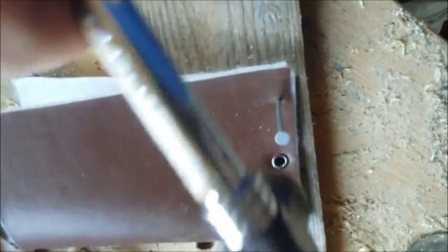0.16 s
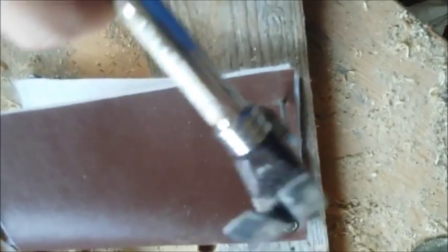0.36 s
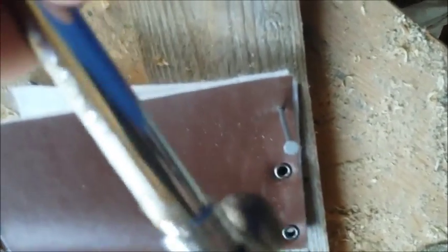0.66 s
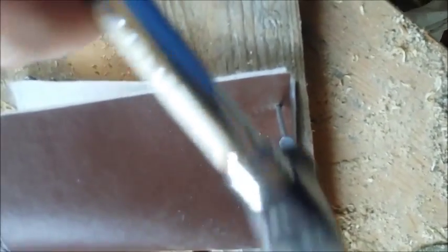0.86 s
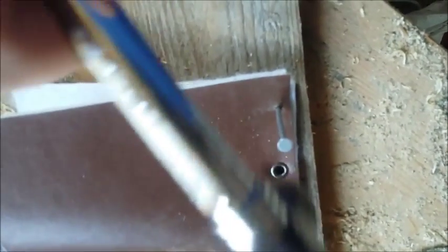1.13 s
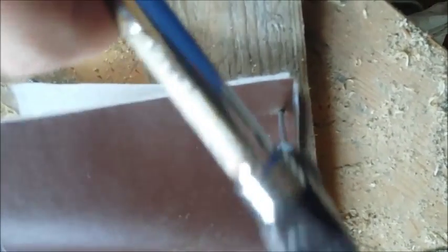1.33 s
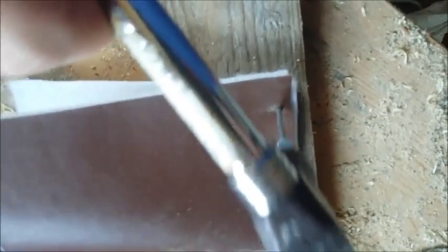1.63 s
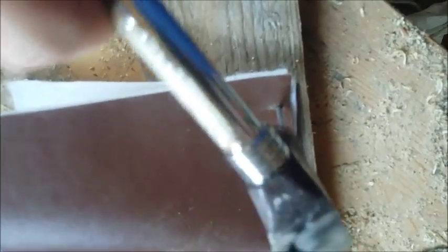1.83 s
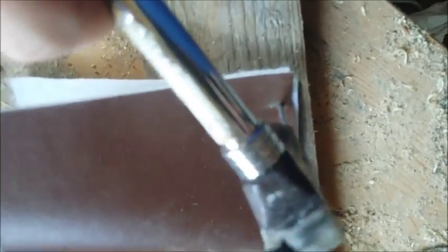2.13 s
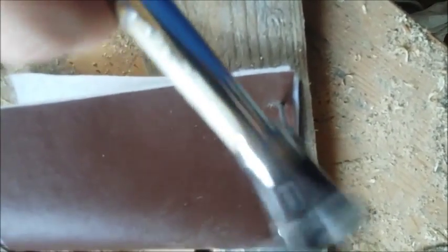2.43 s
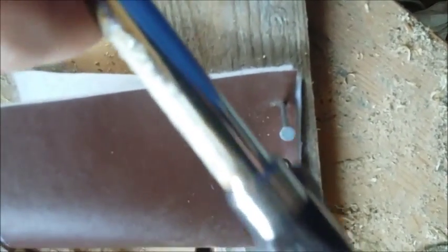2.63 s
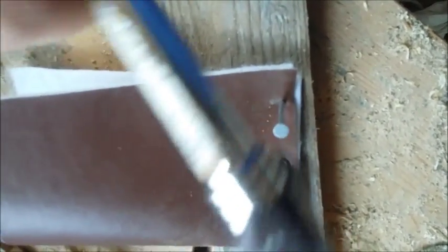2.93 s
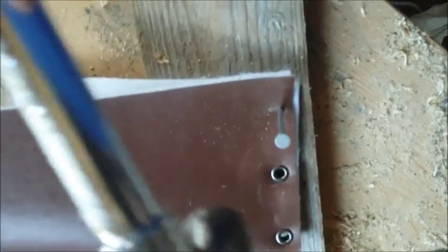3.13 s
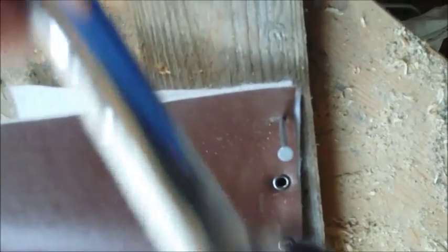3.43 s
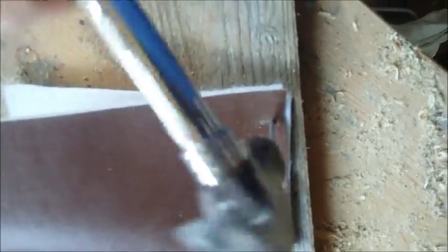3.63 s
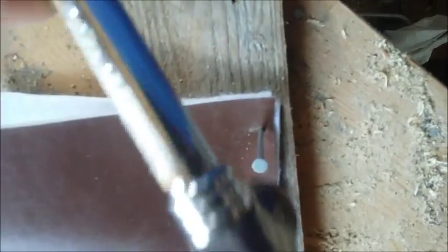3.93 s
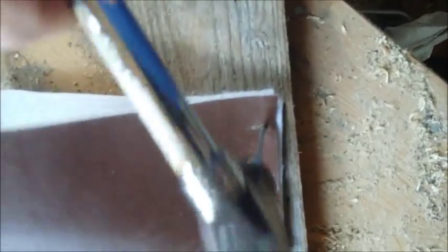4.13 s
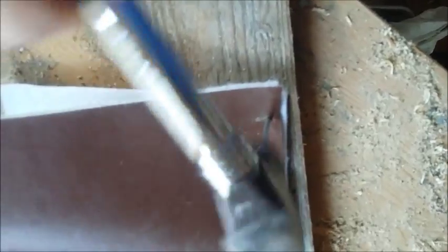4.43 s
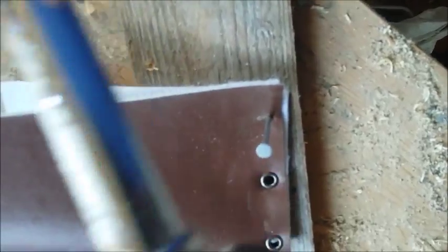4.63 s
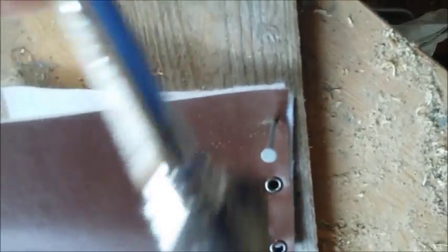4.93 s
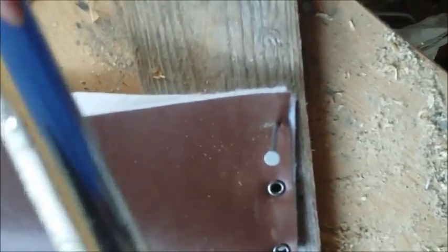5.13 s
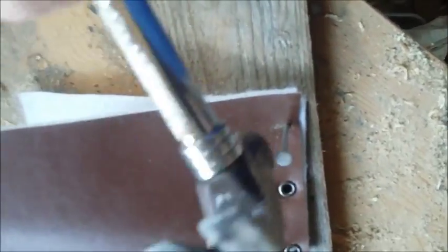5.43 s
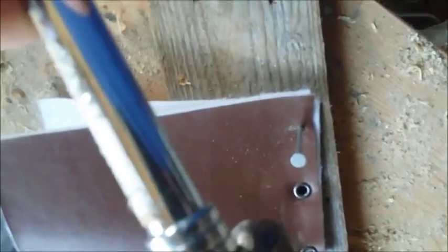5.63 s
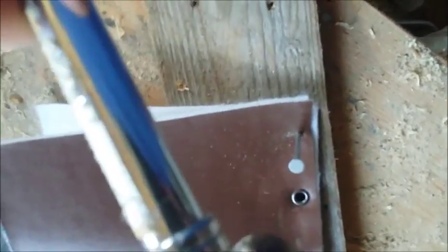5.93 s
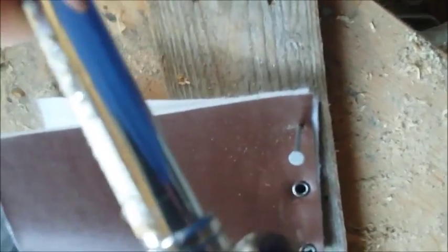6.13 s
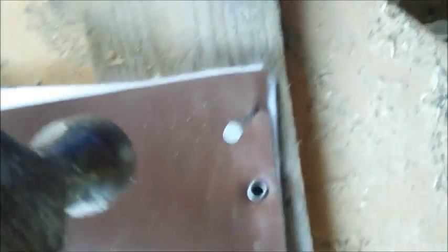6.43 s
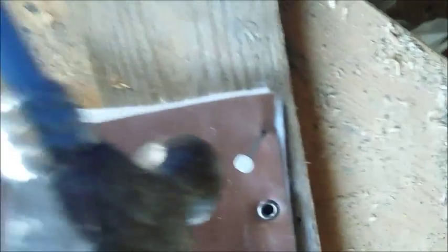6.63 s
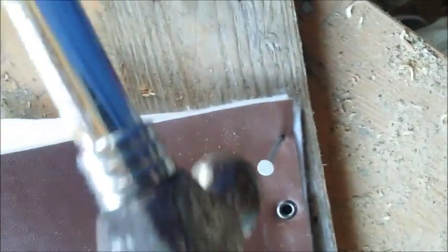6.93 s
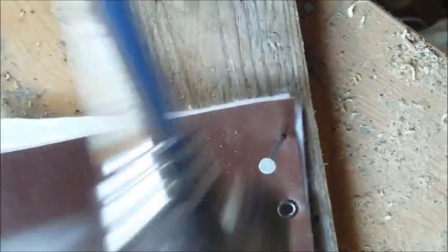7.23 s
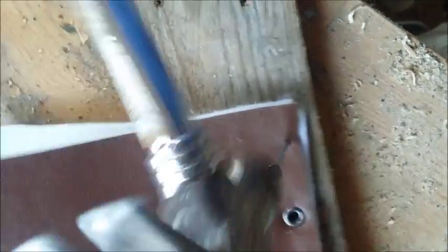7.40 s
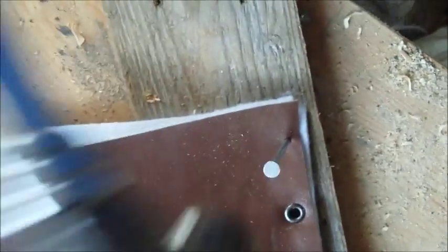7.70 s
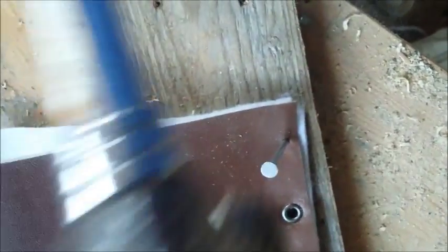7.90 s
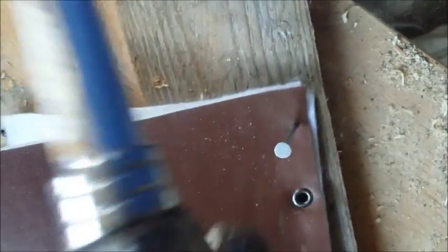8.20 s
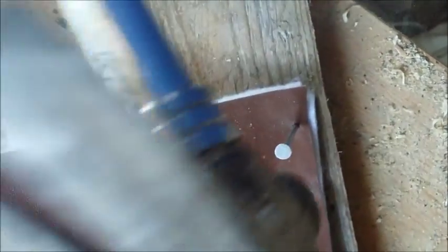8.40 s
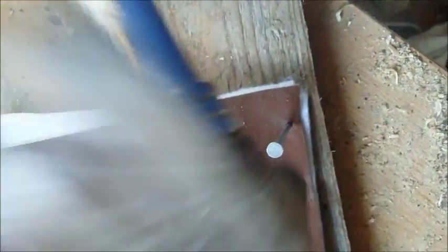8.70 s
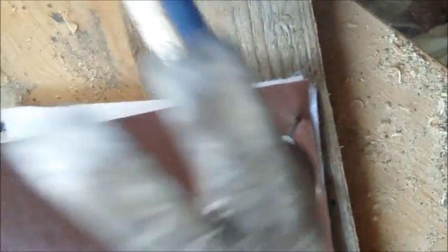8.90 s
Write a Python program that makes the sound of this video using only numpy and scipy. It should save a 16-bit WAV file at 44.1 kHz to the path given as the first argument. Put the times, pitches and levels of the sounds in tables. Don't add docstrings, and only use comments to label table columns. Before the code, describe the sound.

A hammer very close to a small stereo microphone drives a nail through a sheet into a plank. A light tap and scrape lead to a steady run of rattling cracks with bench thuds, then slower blows and a glancing hit. After a short silence come three hard cracks, the first distorting. Faint birds whistle outside over traffic rumble and hiss.

```python
import sys
import numpy as np
from scipy import signal
from scipy.fft import rfft, irfft, next_fast_len
from scipy.io import wavfile
from scipy.ndimage import uniform_filter1d, map_coordinates

SR = 44100
rng = np.random.default_rng(int(sys.argv[2]) if len(sys.argv) > 2 else 0)


def master(y):
    cut = np.clip(np.atleast_2d(y).T, -1, 1)
    pcm = np.round(cut * 32767)
    wavfile.write(sys.argv[1], SR, pcm.astype(np.int16))


def invert_db(x):
    u = np.asarray(x, float) / 20
    return 10 ** u


N = 399546

# start_s, crack_peak_db, bench_thud_db, clack_db
DRIVING_BLOWS = [
    (0.1652, -26.5, -11, -13.5),
    (1.0393, -24, 0, -15.5),
    (1.3373, -18, -0.5, -16),
    (1.6318, -19, 1.5, -12.5),
    (1.932, -18, 1, -11.5),
    (2.2265, -16.5, 1.5, -5.5),
    (2.5478, -13, -2.5, -11),
    (2.9102, -10.5, -1.5, -9),
    (4.1785, -13.5, 2, -4.5),
]
# start_s, crack_peak_db, bench_thud_db, clack_db
DEEP_BLOWS = [
    (4.542, -10, -2.5, -6),
    (4.94, -9.5, -3, -5.5),
]
# start_s, crack_peak_db, bench_thud_db, clack_db
SEATED_BLOWS = [
    (7.521, -1, -15.5, -3),
    (8.164, -11.5, -15.5, -2),
    (8.8752, -12, -15.5, -6),
]
# start_s, crack_peak_db, bench_thud_db, clack_db
GLANCING_BLOWS = [
    (2.5876, -22.5, -12, -3),
    (5.454, -11.5, -20.5, -5),
    (5.4947, -21, -19, 0),
]
# start_s, crack_peak_db, bench_thud_db, clack_db
TOUCHES = [
    (0.1778, -36.5, -1.5, -12),
    (0.2036, -56, -11, 7),
    (0.4399, -35.5, -31, -3),
    (1.1017, -47, -12, -1),
    (1.9902, -43.5, 7.5, 4),
    (2.2851, -43.5, 5.5, -8.5),
    (7.641, -49.5, -7, -25),
]
# start_s, peak_db
GRAZES = [(.4555, -39), (.4925, -41), (.512, -50), (2.533, -54), (4.5195, -45), (4.929, -52), (6.085, -58)]
GRAZE_THUD_DB, GRAZE_CLACK_DB = -21, -9
SLIDE_MS = {"driving": 3.9, "deep": 2.0, "seated": 1.55, "touch": 1.2}
PLANK_DB = {"driving": 7, "deep": 2.57, "seated": 0, "touch": -13}

# pitch_hz, level_db, t60_s
PLANK_MODES = [(164.6, 4, 0.25), (183, -29.5, 0.39), (269.8, -1, 0.49), (307.7, -1, 0.25), (341, -19, 0.21),
               (394.5, -8, 0.66), (487.7, -6, 0.54), (522, 0.5, 0.15), (630.6, 0.5, 0.1),
               (737, -12.5, 0.11), (759.7, -6, 0.12), (1060, -21, 0.05), (1165, -8.5, 0.087),
               (1280, 3.5, 0.014), (1310, -30.5, 0.18), (1720, -31.5, 0.13), (1960, -25.5, 0.13),
               (1940, -26.5, 0.061), (2070, -24.5, 0.13), (2170, -26, 0.14)]
# pitch_hz, level_db, t60_s
SEATED_MODES = [(140, 0, 0.3), (251.5, -2, 0.63), (414.5, -8.5, 0.25), (574, -9, 0.35), (867, -18, 0.24),
                (906, -11, 0.21), (963, -13.5, 0.13), (1186, -4.5, 0.13), (1246, 4.5, 0.051),
                (1310, -5.5, 0.21), (1421, -14, 0.39), (1650, -8, 0.037), (1810, -12, 0.13),
                (2340, -17.5, 0.13), (2560, -16, 0.14), (2300, -18, 0.14), (2680, -17.5, 0.15),
                (2530, -21.5, 0.22), (2870, -14.5, 0.14), (3350, -18, 0.27)]
# pitch_hz, level_db, t60_s
FACE_MODES = [(1300, 3, .06), (1860, -6, .07), (2780, 3, .04), (3050, 1, .035)]
# pitch_hz, level_db, t60_s
EDGE_MODES = [(250, -16, .15), (520, -16, .12), (1180, 7, .1), (1260, 0, .08), (1660, 3, .09),
              (1760, -2, .08), (2750, 2, .05), (3100, -2, .04), (4950, -3, .035)]
# pitch_hz, level_db, t60_s
BENCH_MODES = [(124, -1.5, 0.29), (94, -5.5, 0.23), (66, -8, .2)]
# pitch_hz, t60_s
WOOD_DAMPING = [(100, .25), (500, .19), (1300, .15), (3000, .07)]
# pitch_hz, level_db, t60_s
SHAFT = (1775, -56.5, .65)
JOLT_S, JOLT_WIDTH_S, JOLT_HZ, JOLT_DB = .017, .005, 121, 2.5

# frequency_hz, density_db_per_hz
CRACK = [(710, -27), (1200, 0), (1790, -1.5), (2180, -10.5), (3050, -6.5), (4130, -7), (4860, -5.5),
         (6600, -20), (8530, -23), (10600, -40), (11300, -35.5), (12700, -31.5), (16000, -44.5)]
# frequency_hz, density_db_per_hz
HARD_CRACK = [(710, -28), (1200, 4), (1540, -7), (2110, -16), (2510, -5), (3180, -6.5), (3620, -13.5),
              (5650, -17), (8530, -30.5), (12700, -30.5), (16000, -41)]
# frequency_hz, density_db_per_hz
TAIL = [(24, -51.5), (40, -27.5), (140, -3), (209, -11.5), (312, -13), (382, -9.5), (630, -13),
        (852, -17.5), (1180, -20.5), (1520, -33), (1630, -27.5), (2910, -34.5), (5050, -39), (6820, -51),
        (16000, -79)]
# frequency_hz, density_db_per_hz
HARD_TAIL = [(24, -35.5), (40, -17.5), (170, -5), (270, -4), (382, -7), (680, -6), (873, -15.5), (1210, -7),
             (1480, -19.5), (1630, -15), (2210, -24), (2770, -17.5), (3830, -31), (5180, -30),
             (6490, -40.5), (16000, -68.5)]
# centre_hz, t60_s
SHED = [(50, 0.49), (130, 0.3), (350, 0.19), (920, 0.15), (2430, 0.18), (6400, 0.18)]
# frequency_hz, likeness_0_to_1
ALIKE = [(60, 1), (180, 1), (550, 0.94), (1650, 0.26), (4970, 0.37), (15000, 0.1)]

# start_s, attack_s, hold_s, release_s, level_db
SCRAPE = (.503, .022, .037, .014, -46)
# frequency_hz, density_db_per_hz
RASP = [(290, -49), (500, -20), (1070, 0), (2060, 1), (2820, -7), (3580, -0.5), (3910, -3), (4260, -19),
        (10000, -37), (13000, -74), (22000, -120)]
# centre_s, half_length_s, level_db
RUSTLES = [
    (3.55, .05, -72),
    (3.71, .065, -68),
    (4.8, .05, -69),
    (6.08, .06, -73),
    (6.9, .09, -64),
]
# frequency_hz, density_db_per_hz
CRINKLE = [(2060, -39), (3500, -26), (3740, -23), (4070, 4.5), (4920, -3), (5920, -7), (9000, -23),
           (11700, -50), (19800, -120)]

# start_s, start_pitch_hz, level_db
FLICKS = [
    (3.2, 2700, -62),
    (3.478, 2680, -60),
    (3.672, 2380, -66),
    (3.75, 2600, -62),
    (4.03, 2660, -64),
    (4.125, 3250, -65),
]
FLICK_S, FLICK_RISE, FLICK_BEND_S = .05, .22, .018
# start_s, length_s, pitch_hz, slide_hz_per_s, level_db
NOTES = [(3.232, .026, 3170, -33000, -65), (3.26, .2, 3190, -80, -75), (3.32, .11, 2650, 300, -73),
         (3.525, .04, 3120, 300, -68), (3.58, .05, 2810, -4200, -67), (3.63, .045, 2560, -1000, -69),
         (3.84, .095, 2720, -200, -66), (3.96, .03, 2790, 300, -67), (1.29, .44, 3360, 20, -59.5),
         (5.955, .05, 2870, -1800, -65), (5.99, .08, 2780, 1300, -62), (6.065, .14, 2870, -150, -70),
         (7.99, .12, 2880, 100, -91), (4.34, .13, 7600, -900, -82), (4.65, .09, 7000, -900, -84),
         (4.755, .05, 6900, 50, -80)]
SWELL_DB = 5

# time_s, level_db
BACKGROUND = [(0, -60.5), (.3, -54.5), (1.0, -58), (1.6, -54), (3.0, -54.5), (3.35, -59), (3.8, -56),
              (5.0, -56.5), (5.95, -62), (6.2, -61.5), (6.9, -54.5), (9.1, -62.5)]
# frequency_hz, density_db_per_hz
RUMBLE = [(12, -34.5), (20, -7), (27, -21), (51, -8.5), (92, -3.5), (146, -6.5), (199, -6), (275, -8.5),
          (310, -14.5), (1200, -30), (1560, -56), (2640, -120)]
# frequency_hz, density_db_per_hz
HISS = [(350, -28), (600, -4.5), (1010, -6), (1110, -6.5), (1740, -6), (2500, -2), (2720, -4.5),
        (3430, -2.5), (4420, -6.5), (5130, -13.5), (5880, -15), (7500, -22.5), (9750, -52.5), (16500, -120)]
HISS_DB, HISS_GROWS = -11.5, 0.89

# frequency_hz, left_minus_right_db
PORTS = [(60, -2.5), (110, -2), (200, 0), (380, -1.5), (700, 0.5), (1290, -0.5), (2380, -1.5), (4400, -2),
         (8120, -5), (15000, 0)]
# centre_hz, width_hz, boost_db
CAVITIES = [
    (2800, 450, 5),
    (4850, 550, 10),
]
# start_s, deaf_s, deaf_by_db, membrane_swing_hz, swing_db
OVERLOAD = (7.5235, .021, -24, 92, -2.5)
DUCK_S, RUMBLE_DUCK_DB, HISS_DUCK_DB, SELF_DUCK_DB = 0.1, -11.5, -19.5, -6.5
SELF_DB = -79
# time_s, gain
FADER = [
    (0, 1),
    (6.212, 1),
    (6.222, .02),
    (6.25, 0),
    (6.555, 0),
    (6.95, 1),
    (9.1, 1),
]


def unit(x):
    return x / np.sqrt(np.mean(x ** 2) + 1e-20)


def along(points, hz):
    f, v = np.transpose(points)
    return np.interp(np.log(hz + 1), np.log(f + 1), v)


def curves(rows):
    s, *cols = np.transpose(rows)
    return [np.interp(np.arange(N) / SR, s, c) for c in cols]


def wobble(rate):
    knots = rng.standard_normal(int(N * rate / SR) + 4)
    return map_coordinates(knots, [np.arange(N) * rate / SR])


def decay(t, t60):
    return np.exp(-np.log(1000) * t / t60)


def pair(white, spectrum, alike):
    hz = np.fft.rfftfreq(white.shape[1], 1 / SR)
    gain = invert_db(along(spectrum, hz))
    turn = np.arccos(np.clip(along(alike, hz), -1, 1)) / 2
    mid, side = rfft(white) * gain * [np.cos(turn), np.sin(turn)]
    return hz, np.array([mid + side, mid - side]) / np.sqrt(np.mean(gain ** 2))


def rush(spectrum, alike, patchy_db):
    z = signal.stft(rng.standard_normal((2, N + 1024)), nperseg=512)[2]
    field = uniform_filter1d(rng.standard_normal(z.shape[1:]), size=6, axis=0)
    field = uniform_filter1d(field, size=14, axis=1)
    white = signal.istft(z * invert_db(patchy_db * unit(field)), nperseg=512)[1][:, :N]
    return unit(irfft(pair(white, spectrum, alike)[1], N))


def nail_rattle(t, slide, crack):
    burst = np.where(t < slide, invert_db(-3.5 * (1.5 - t / slide)), invert_db(-60 * (t - slide) / 0.0055))
    rattle = burst * irfft(pair(rng.standard_normal((2, len(t))), crack, ALIKE)[1])
    return rattle / np.sqrt(np.mean(rattle ** 2) / np.mean(burst ** 2))


def wood_ring(t, slide, modes, colour):
    late = np.maximum(t - 0.8054 * slide, 0)
    wood = 0
    for hz, db, t60 in modes:
        rise = 1 - np.exp(-late * hz / 1.9)
        level = invert_db(db + along(colour, hz) + rng.normal(0, 1.5))
        ring = decay(late, min(t60, along(WOOD_DAMPING, hz))) * np.sin(2 * np.pi * hz * late)
        wood = wood + level * rise * ring
    return wood


def shed_answer(t, tail, walls, colour):
    hz, answer = pair(rng.standard_normal((2, len(t))), tail, ALIKE)
    same = pair(walls, tail, ALIKE)[1]
    answer = np.where(hz < 800, same, answer)
    answer = answer * invert_db(along(colour, hz))
    shed = 0
    centres = [centre for centre, _ in SHED]
    for band, (centre, t60) in zip(np.eye(len(SHED)), SHED):
        share = along(list(zip(centres, band)), hz)
        build_up = 1 - np.exp(-(t * centre / 0.6) ** 2)
        shed = shed + irfft(answer * share) * decay(t, t60) * build_up
    return shed


def blow(peak_db, levels, slide_ms, usual, modes, crack, tail, walls):
    t, slide = np.arange(16384) / SR, slide_ms / 1000
    bench_db, plank_db, clack_db = np.array(levels) - usual
    colour = [(150, bench_db), (550, plank_db), (1350, clack_db), (2600, 0.0021)]
    rattle = nail_rattle(t, slide, crack)
    wood = wood_ring(t, slide, modes, colour)
    shed = shed_answer(t, tail, walls, colour)
    after = t - JOLT_S
    jolt = np.exp(-(after / JOLT_WIDTH_S) ** 2) * np.sin(2 * np.pi * JOLT_HZ * after)
    jolt = invert_db(levels[0] + JOLT_DB) * jolt
    loud_db = np.mean(usual) + 3
    return invert_db(peak_db) * (jolt + invert_db(-3) * rattle + invert_db(loud_db - 5) * wood + invert_db(loud_db - .5) * shed)


def wood_levels(kind, thud_db, clack_db):
    return [thud_db, (thud_db + clack_db) / 2 + PLANK_DB[kind], clack_db]


def shaft_ring():
    out, t = np.zeros((2, N + SR)), np.arange(SR) / SR
    hz, db, t60 = SHAFT
    grip = invert_db(2.5 * wobble(25)[:SR])
    for s, peak_db, *_ in SEATED_BLOWS:
        ring = grip * invert_db(db + .4 * peak_db - 60 * t / t60) * np.sin(2 * np.pi * hz * t)
        out[:, round(s * SR):][:, :SR] += ring
    return out[:, :N]


def hammer():
    out = np.zeros((2, N + SR))
    walls = rng.standard_normal((2, 16384))
    grazes = [(s, db, GRAZE_THUD_DB, GRAZE_CLACK_DB) for s, db in GRAZES]
    usual_soft = wood_levels("driving", *np.mean(DRIVING_BLOWS, 0)[2:])
    usual_hard = wood_levels("seated", *np.mean(SEATED_BLOWS, 0)[2:])
    kinds = [("driving", DRIVING_BLOWS, usual_soft, PLANK_MODES, CRACK, TAIL),
             ("deep", DEEP_BLOWS, usual_soft, PLANK_MODES, CRACK, TAIL),
             ("seated", SEATED_BLOWS, usual_hard, SEATED_MODES + FACE_MODES, HARD_CRACK, HARD_TAIL),
             ("seated", GLANCING_BLOWS, usual_hard, EDGE_MODES, CRACK, HARD_TAIL),
             ("touch", TOUCHES + grazes, usual_hard, SEATED_MODES, CRACK, HARD_TAIL)]
    for kind, rows, usual, modes, crack, tail in kinds:
        for s, peak_db, thud_db, clack_db in rows:
            levels = wood_levels(kind, thud_db, clack_db)
            sound = blow(peak_db, levels, SLIDE_MS[kind], usual, modes + BENCH_MODES, crack, tail, walls)
            out[:, round(s * SR):][:, :sound.shape[1]] += sound
    return out[:, :N] + shaft_ring()


def scrape():
    t = np.arange(N) / SR
    s, attack, hold, release, db = SCRAPE
    end = s + attack + hold + release
    stroke = np.clip(np.minimum((t - s) / attack, (end - t) / release), 0, 1) ** 2
    return stroke * invert_db(db + 1.0 * wobble(390)) * rush(RASP, ALIKE, patchy_db=-2.5)


def sheet_rustle():
    t = np.arange(N) / SR
    swells = sum(invert_db(db) * np.exp(-((t - s) / half) ** 4) for s, half, db in RUSTLES)
    return swells * rush(CRINKLE, [(1000, 0.06)], patchy_db=3)


def whistle(length, db, pitch):
    u = np.arange(round(length * SR)) / SR
    edge = np.clip(np.minimum(u, length - u) / 0.0094, 0, 1)
    swell = invert_db(db + 3.8 - SWELL_DB * (2 * u / length - 1) ** 2)
    return edge * swell * np.sin(2 * np.pi * np.cumsum(pitch(u)) / SR)


def birds():
    calls = []
    for s, hz, db in FLICKS:
        bend = lambda u, hz=hz: hz * (1 + FLICK_RISE * (1 - np.exp(-u / FLICK_BEND_S)))
        calls.append((s, whistle(FLICK_S, db, bend)))
    for s, length, hz, slide, db in NOTES:
        calls.append((s, whistle(length, db, lambda u: hz + slide * u)))
    direct = np.zeros(N)
    for s, call in calls:
        direct[round(s * SR):][:len(call)] += call
    direct = direct * invert_db(2.2 * wobble(45))
    yard = rng.standard_normal((2, SR // 2)) * invert_db(-60 * np.arange(SR // 2) / SR / .5)
    yard = yard / np.linalg.norm(yard[0])
    echoes = signal.fftconvolve(direct[None], yard, axes=1)[:, :N]
    return direct * invert_db([[1.5], [-1.5]]) + invert_db(-10) * echoes


def ducked(db):
    since = np.maximum(np.arange(N) / SR - OVERLOAD[0], 0)
    return invert_db(db * (1 - np.exp(-since / DUCK_S)))


def air():
    background_db, = curves(BACKGROUND)
    mean_db = background_db.mean()
    hiss_db = mean_db + HISS_DB + HISS_GROWS * (background_db - mean_db)
    rumble = invert_db(background_db + 1.2 * wobble(16)) * rush(RUMBLE, [(200, .84), (700, .2)], patchy_db=1.5)
    hiss = invert_db(hiss_db + 3 + .8 * wobble(3)) * rush(HISS, [(1000, .05)], patchy_db=2.2)
    return ducked(RUMBLE_DUCK_DB) * rumble + ducked(HISS_DUCK_DB) * hiss


def scene():
    return hammer() + scrape() + sheet_rustle() + birds() + air()


def ports(dry, size, hz):
    delay = 9 / SR / (1 + (hz / 2500) ** 2)
    half = invert_db(along(PORTS, hz) / 2) * np.exp(-1j * np.pi * hz * delay)
    cavity = [1 + (invert_db(db) - 1) * 1j * hz * width / (centre ** 2 - hz ** 2 + 1j * hz * width)
              for centre, width, db in CAVITIES]
    low_cut = (1j * hz / (45 + 1j * hz)) ** 2
    return irfft(rfft(dry, size) * [half, 1 / half] * cavity * low_cut, size)[:, :N]


def overload(right):
    s, deaf, by_db, swing_hz, swing_db = OVERLOAD
    t = np.maximum(np.arange(N) / SR - s, 0)
    stuck = (t > 0) * np.exp(-(t / deaf) ** 8)
    swing = invert_db(swing_db - 60 * t / .075) * np.sin(2 * np.pi * swing_hz * t + .8)
    return right * invert_db(by_db * stuck) + swing * (1 - np.exp(-t / .0005))


def roll_off(x):
    return signal.sosfilt(signal.butter(12, 16810, fs=SR, output="sos"), x)


def record(dry):
    size = next_fast_len(N + 4096)
    hz = np.fft.rfftfreq(size, 1 / SR)
    left, right = ports(dry, size, hz)
    both = np.array([left, overload(right)])
    self_noise = invert_db(SELF_DB + 1.2 * wobble(2.5)) * rng.standard_normal((2, N))
    both = both + ducked(SELF_DUCK_DB) * self_noise
    both = both / (1 + np.abs(both / .9) ** 4) ** (1 / 4)
    both = irfft(rfft(both, size) * (hz < 16450), size)[:, :N]
    mix = both * np.clip(curves(FADER)[0], 0, 1)
    return roll_off(mix)


dry = scene()
out = record(dry)
master(out)
```